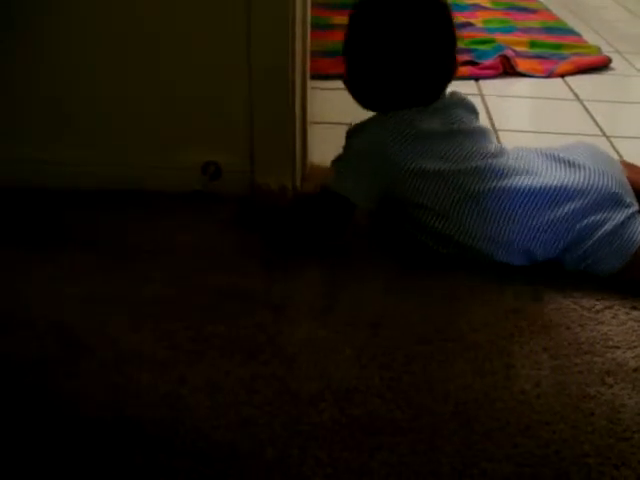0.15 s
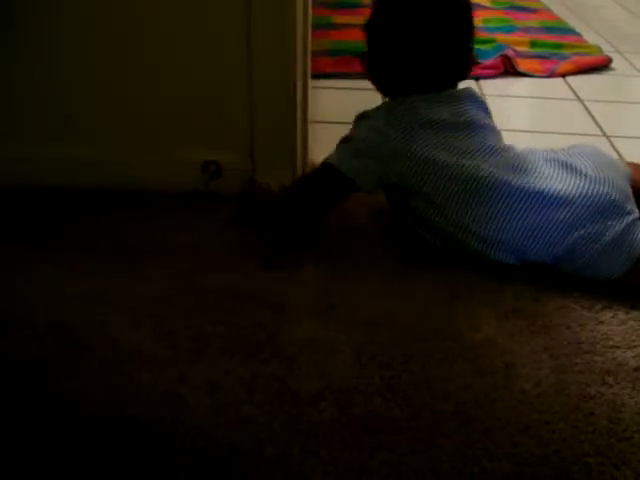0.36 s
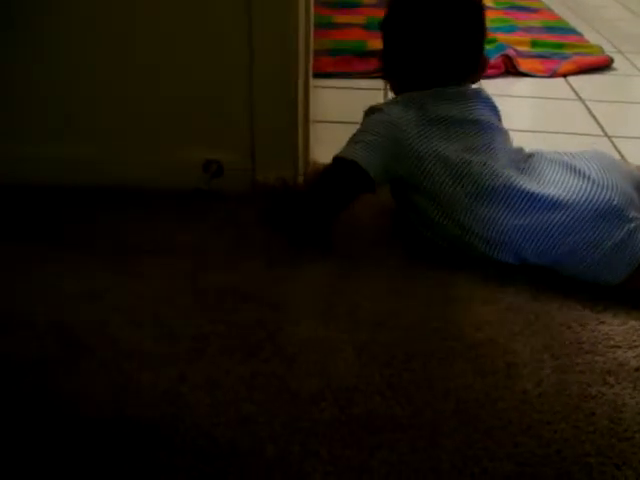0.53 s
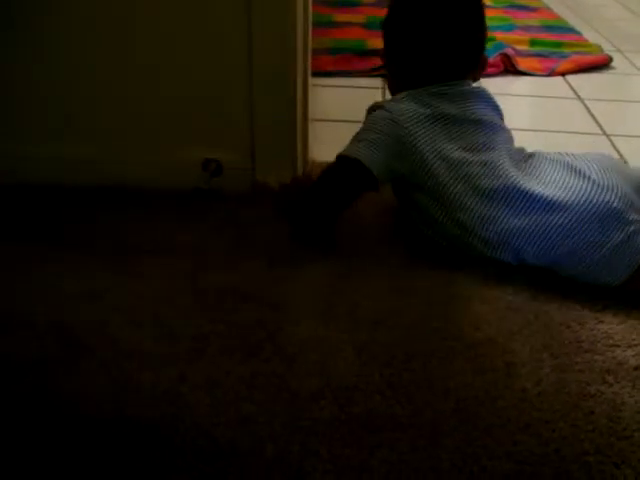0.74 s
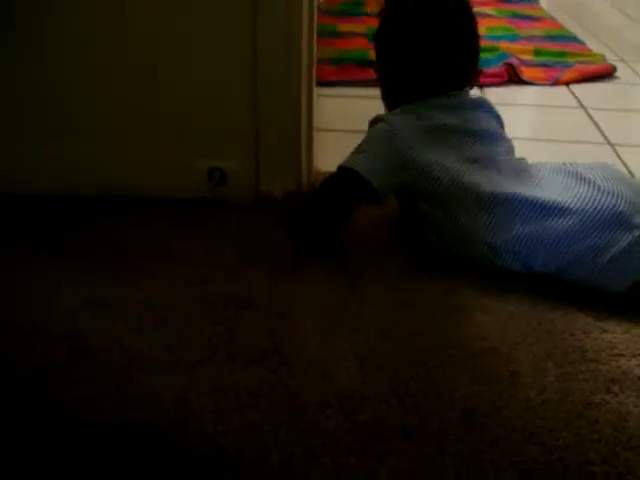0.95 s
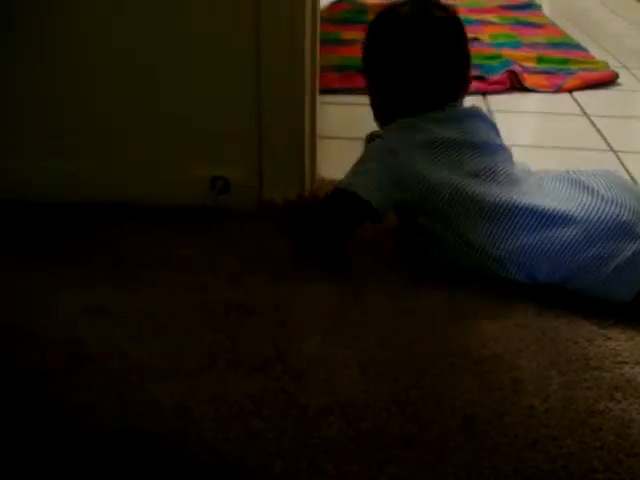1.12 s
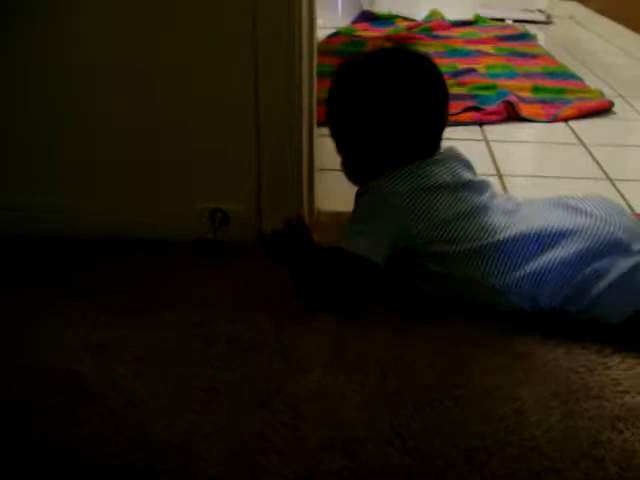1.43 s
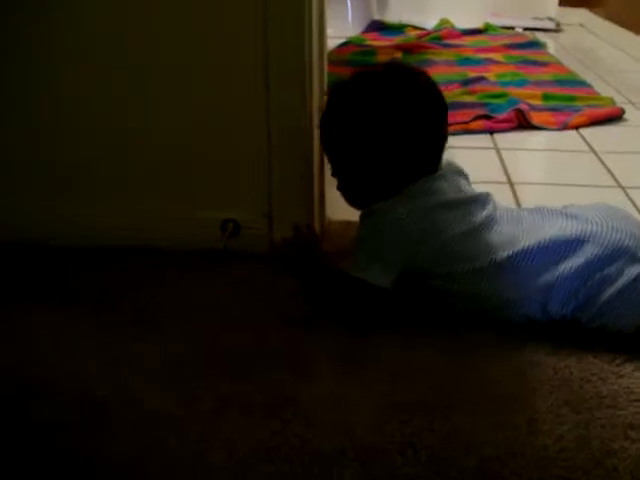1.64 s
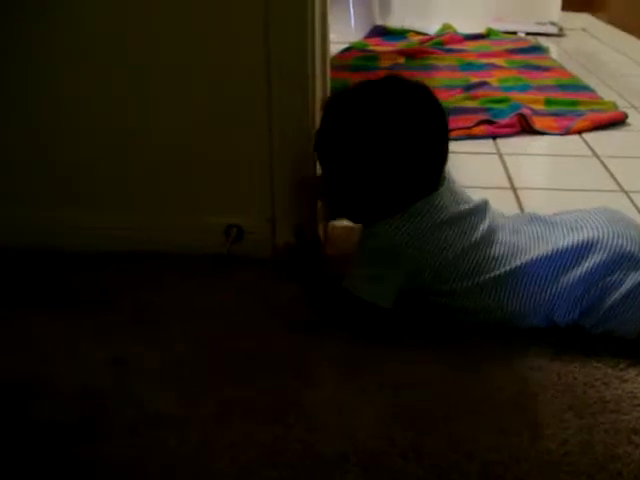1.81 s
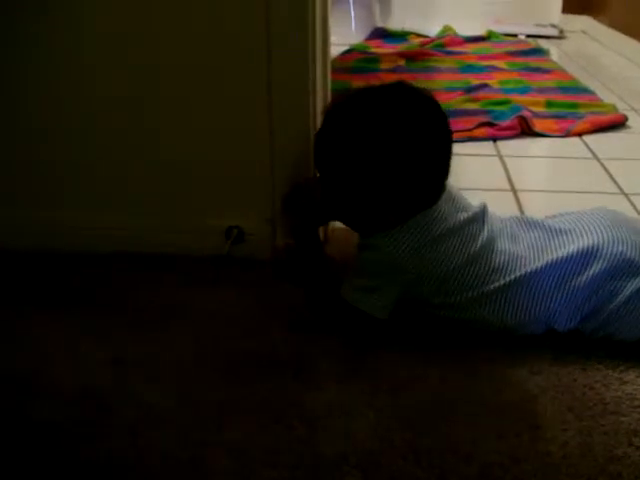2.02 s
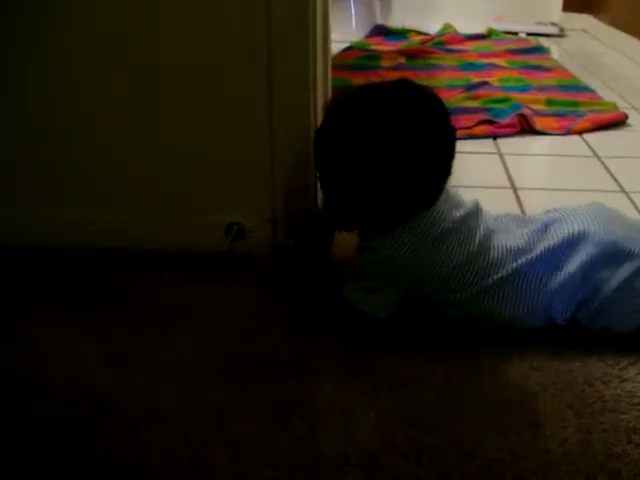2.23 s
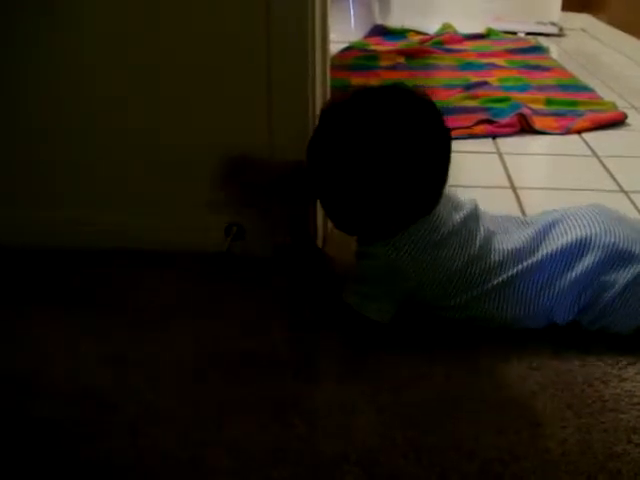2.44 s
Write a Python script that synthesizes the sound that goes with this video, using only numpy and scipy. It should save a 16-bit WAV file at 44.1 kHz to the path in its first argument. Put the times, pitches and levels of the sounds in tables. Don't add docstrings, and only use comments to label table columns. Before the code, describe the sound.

A flicked spring door stop vibrates on a hollow door in rapid knocks with metallic coil chatter, weakens midway, grows strong again, then a hand slaps it still; quiet tiled room, small hissy camera microphone.

```python
import sys
import numpy as np
from scipy import signal
from scipy.fft import rfft, irfft, next_fast_len
from scipy.io import wavfile
from scipy.ndimage import map_coordinates

SR = 44100
rng = np.random.default_rng(int(sys.argv[2]) if len(sys.argv) > 2 else 0)


def gain_from_db(level_db):
    decades = np.asarray(level_db, float) / 20
    return 10 ** decades


def store_wav(level_fs):
    pcm = np.round(np.clip(np.atleast_2d(level_fs), -1, 1) * 32767)
    wavfile.write(sys.argv[1], SR, pcm.T.astype(np.int16))


N = 113337

# (swing number [count], time [s])
KNOCK_CLOCK = [(-2, -.0608), (0, .0468), (7, .4241), (16, .9114), (30, 1.670), (33, 1.8315), (38, 2.0979),
               (45, 2.4682), (47, 2.5738)]
# (swing number [count], time [s])
TICK_CLOCK = [(0, .0206), (4, .2353), (11, .6123), (18, .9887), (26, 1.4237), (31, 1.6918), (36, 1.9579),
              (45, 2.436)]
# (time [s], knock [dB], tick [dB], coil clicks [dB])
SWING = [(0, -22, -33, -30.5), (.2, -25, -33.5, -35.5), (.4, -25, -36.5, -34), (.66, -34.5, -41.5, -41.5),
         (.95, -36, -40, -40), (1.25, -38.5, -39, -39.5), (1.4, -36.5, -41, -35), (1.52, -37.5, -45, -68),
         (1.7, -32, -38.5, -60), (1.9, -22, -39.5, -33.5), (2.06, -23, -41, -33.5), (2.25, -23, -57, -38),
         (2.48, -25.5, -62, -41.5)]
# (lag [s], early thud [dB], late thud [dB], click [dB])
CHATTER = [
    (-.003, -8, -8, -18),
    (-.0005, -1.5, -1.5, -6),
    (.004, -14, -7, -16),
    (.0098, -12, -5, -3),
    (.013, -5, -9, -14),
    (.02, -6, -8, -5),
    (.0265, -5, -11, -16),
    (.034, -18, -24, -8),
    (.043, -18, -24, -12),
]
# (frequency [Hz], width [Hz], level [dB])
DOOR_MODES = [(550, 80, -8), (665, 45, -14), (738, 40, -1), (818, 45, 1), (890, 220, -5), (1000, 60, -7),
              (1075, 50, -6), (1125, 50, -11), (1320, 70, -6), (1620, 120, -8)]
# (frequency [Hz], width [Hz], level [dB])
COIL_MODES = [(1750, 250, -13), (2450, 260, -6), (2790, 170, 0), (3250, 350, -7), (4035, 170, -4),
              (7200, 1500, -17)]
FOCUS = {"door": (880, 700), "coils": (3300, 4000)}
# (order [count], sign at the knock [+-1], early [dB], late [dB])
OVERTONES = [(11, 1, -12, -11), (14, 1, -15, -13), (15, -1, -14, -13), (16, 1, -3, -6), (17, 1, -3, -4),
             (18, 1, -8, -13), (19, 1, 0, -40), (19, -1, -40, 0), (20, 1, -16, -7), (22, 1, -17, -5),
             (23, 1, -7, -22), (24, 1, -8, -15)]
# (time [s], overtones [dB], main overtone [dB], upper overtone [dB])
SONG = [(0, -43, -40, -49), (.33, -45, -40, -47), (.6, -53, -44, -49), (.9, -59, -48, -49),
        (1.2, -57, -55, -55), (1.5, -55, -58, -58), (1.8, -47, -42, -50), (2.0, -42, -37, -66),
        (2.2, -42, -34, -68), (2.48, -44, -35, -62)]
# (frequency [Hz], density [dB per Hz])
AIR_SPECTRUM = [(22, -22), (170, -17.5), (430, -16), (620, -24.5), (1100, -26), (2000, -32.5), (2900, -33),
                (11000, -42)]
# (frequency [Hz], level [dB rms])
HUM = [(119.95, -46)]
# (frequency [Hz], level [dB rms])
SIDE_LINES = [(7864.1, -61.5), (6627, -76), (6655.9, -76)]
# (time [s], level [full scale])
OFFSET = [(0, -.0805), (.35, -.083), (.7, -.082), (1.25, -.0765), (1.9, -.0705), (2.57, -.0665)]
# (time [s], peak [dB], frequency [Hz], rise [s], T60 [s])
SLAP = [
    (2.4936, -11.5, 850, 0.0052, 0.0096),
    (2.5055, -20.5, 739, 0.0048, 0.013),
    (2.5135, -25, 740, 0.0036, 0.021),
    (2.5205, -19.5, 727, 0.0028, 0.025),
    (2.542, -26.5, 812, 0.0016, 0.039),
]
# (time [s], level [dB], T60 [s])
CRACKS = [
    (2.4971, -18.5, 0.011),
    (2.5, -25, 0.064),
    (2.51, -32.5, 0.043),
    (2.517, -35.5, 0.074),
    (2.543, -35, 0.048),
]
# (frequency [Hz], level [dB])
CRACK_SPECTRUM = [(300, 9), (1400, 5.5), (2100, -8), (3000, 1), (4200, -8), (6000, -16.5), (7600, -17),
                  (10000, -22)]

STOP_S, STOP_T60_S = 2.497, .2
TURN_S = (1.2, 1.6)
THUD_S, CLICK_S = .0007, .00018
SCATTER_S, SCATTER_DB = .00008, 1
RATTLE_S, TICK_SCATTER_DB = (0, .0008, .0019), 1.8
ROOM_T60_S, ROOM_DB, SLAP_DRY_DB = .2, -8, -1.5
MAIN_ORDER, UPPER_ORDER, LOW_ORDER, LOW_DB = 21, 25, 12, -53
LEAD_CYCLES, MAIN_LEAD_CYCLES = .65, (.92, .6)
WANDER_RAD, WANDER_DB = .2, 1
AIR_DB = -43.5
WHINE_HZ, WHINE_DB = 7711.5, -52.5
SLIPS_PER_S, SLIP_AT_S, SLIP_S, SLIP_SHARE = 28.87, .0157, .00078, .79
CRACK_RISE_S = .0015
SNAP_S, SNAP_DB, SNAP_HZ, SNAP_LEN_S = 2.4997, -32, (7430, 7950), .00084
TOP_HZ, TOP_ORDER = 11140, 32


def unit(x):
    return x / np.sqrt(np.mean(x ** 2) + 1e-20)


def clock():
    return np.arange(N) / SR


def wobble(rate_hz):
    knots = rng.standard_normal(int(N * rate_hz / SR) + 4)
    return map_coordinates(knots, [np.arange(N) * rate_hz / SR])


def filtered(x, response):
    m = next_fast_len(N + SR // 2)
    hz = np.fft.rfftfreq(m, 1 / SR)
    return irfft(rfft(x, m) * response(hz), m)[:N]


def coloured(x, points):
    f, db = np.transpose(points)
    return filtered(x, lambda hz: gain_from_db(np.interp(np.log(hz + 1), np.log(f + 1), db)))


def resonance(hz, centre_hz, width_hz):
    damping = 1j * hz * width_hz
    return damping / (centre_hz * centre_hz - hz * hz + damping)


def struck(times_s, gains, modes, contact_s, focus):
    def ring(hz):
        body = sum(gain_from_db(db) * resonance(hz, centre, width) for centre, width, db in modes)
        return body * resonance(hz, *FOCUS[focus]) * np.exp(-.5 * (hz * contact_s) ** 2)

    early = SR // 20
    at = np.round(times_s * SR).astype(int) + early
    keep = (times_s > -.04) & (times_s < STOP_S)
    blows = np.bincount(at[keep], gains[keep], N)[:N]
    rung = filtered(blows, ring)
    one_blow = filtered(np.arange(N) == early, ring)
    return np.pad(rung[early:], (0, early)) / np.abs(one_blow).max()


def swing(s, axis):
    rows = np.array(SWING)
    return gain_from_db(np.interp(s, rows[:, 0], rows[:, axis]))


def beats(table):
    n, s = np.transpose(table)
    return np.interp(np.arange(n[0], n[-1] + 1), n, s)


def chatter():
    lag, early_db, late_db, click_db = np.transpose(CHATTER)
    knock = beats(KNOCK_CLOCK)[:, None]
    tick = beats(TICK_CLOCK) - .001
    contact = knock + lag
    luck = rng.standard_normal((3,) + contact.shape)

    turn = np.interp(knock, TURN_S, [0, 1])
    thud_db = early_db + turn * (late_db - early_db) + SCATTER_DB * luck[0]
    thud = -swing(knock, axis=1) * gain_from_db(thud_db)

    click = swing(knock, axis=3) * gain_from_db(click_db)
    when = np.r_[(contact + .0007 * luck[2]).ravel(), tick][:, None] + RATTLE_S
    size = np.r_[click.ravel(), swing(tick, axis=2)][:, None]
    touch = rng.standard_normal((2,) + when.shape)
    size = size * gain_from_db(TICK_SCATTER_DB * touch[0])

    door = struck(contact + SCATTER_S * luck[1], thud, DOOR_MODES, THUD_S, "door")
    coils = struck(when + .0002 * touch[1], size, COIL_MODES, CLICK_S, "coils")
    return door + coils


def twang():
    t = clock()
    n, s = np.transpose(KNOCK_CLOCK)
    swings = np.interp(t, s, n)
    turn = np.interp(t, TURN_S, [0, 1])
    at, *levels = np.transpose(SONG)
    many, main, upper = (gain_from_db(np.interp(t, at, db)) for db in levels)

    def tone(order, lead=LEAD_CYCLES):
        phase = 2 * np.pi * (order * swings + lead) + WANDER_RAD * wobble(4.3)
        return np.cos(phase) * gain_from_db(WANDER_DB * wobble(5.97))

    song = many * sum(sign * gain_from_db(a + turn * (b - a)) * tone(k) for k, sign, a, b in OVERTONES)
    song += main * tone(MAIN_ORDER, np.interp(t, TURN_S, MAIN_LEAD_CYCLES))
    song += upper * tone(UPPER_ORDER)
    song += gain_from_db(LOW_DB) * tone(LOW_ORDER)
    stop = gain_from_db(-60 * np.maximum(t - STOP_S, 0) / STOP_T60_S)
    return np.sqrt(2) * stop * song


def room_feed(near):
    return near * np.where(clock() > SLAP[0][0], gain_from_db(SLAP_DRY_DB), 1)


def room(x):
    t = np.arange(SR // 3) / SR
    tail = rng.standard_normal(len(t)) * gain_from_db(-60 * t / ROOM_T60_S) * (t > .004)
    return gain_from_db(ROOM_DB) * signal.fftconvolve(x, tail / np.linalg.norm(tail))[:N]


def air():
    hum = np.zeros(N)
    for hz, db in HUM:
        level = gain_from_db(db + 1.17 * wobble(7.97))
        hum += level * np.sin(2 * np.pi * hz * clock() + .5 * wobble(12))
    drift_db = .3 * wobble(3)
    hiss = unit(coloured(rng.standard_normal(N), AIR_SPECTRUM))
    return gain_from_db(AIR_DB + drift_db) * hiss + np.sqrt(2) * hum


def whine():
    t = clock()
    u = ((t - SLIP_AT_S) * SLIPS_PER_S + .5) % 1 - .5
    jump = .5 * np.tanh(u / SLIPS_PER_S / SLIP_S)
    slip = (1 - SLIP_SHARE) * u + SLIP_SHARE * jump
    tone = gain_from_db(WHINE_DB) * np.sin(2 * np.pi * (WHINE_HZ * t - slip))
    side = sum(gain_from_db(db) * np.sin(2 * np.pi * hz * t) for hz, db in SIDE_LINES)
    return np.sqrt(2) * (tone + side)


def slap():
    t = clock()
    thuds, cracks = np.zeros(N), np.zeros(N)
    for s, db, hz, rise_s, t60_s in SLAP:
        u = np.maximum(t - s, 0)
        decay = gain_from_db(db - 60 * np.maximum(u - rise_s, 0) / t60_s)
        thuds += decay * np.minimum(u / rise_s, 1) * np.sin(2 * np.pi * hz * u)
    for s, db, t60_s in CRACKS:
        rise = np.clip((t - s) / CRACK_RISE_S, 0, 1)
        cracks += rise * gain_from_db(db - 60 * np.maximum(t - s, 0) / t60_s)
    return thuds + cracks * unit(coloured(rng.standard_normal(N), CRACK_SPECTRUM))


def snap():
    u = clock() - SNAP_S
    pulse = np.exp(-.5 * (u / SNAP_LEN_S) ** 2)
    return gain_from_db(SNAP_DB) * pulse * sum(np.sin(2 * np.pi * hz * u) for hz in SNAP_HZ)


def scene():
    near = chatter() + slap() + snap()
    return (near + room(room_feed(near)) + twang() + air())[None]


def low_pass(x):
    return signal.sosfilt(signal.butter(12, 11990, fs=SR, output="sos"), x)


def record(dry):
    band = filtered(dry[0] + whine(), lambda hz: 1 / (1 + (hz / TOP_HZ) ** TOP_ORDER))
    offset = np.interp(clock(), *np.transpose(OFFSET))
    return low_pass(band[None] + offset)


dry = scene()
out = record(dry)
store_wav(out)
```